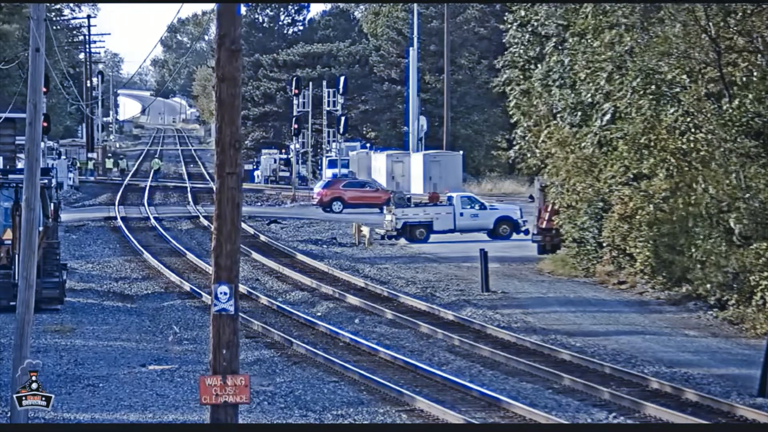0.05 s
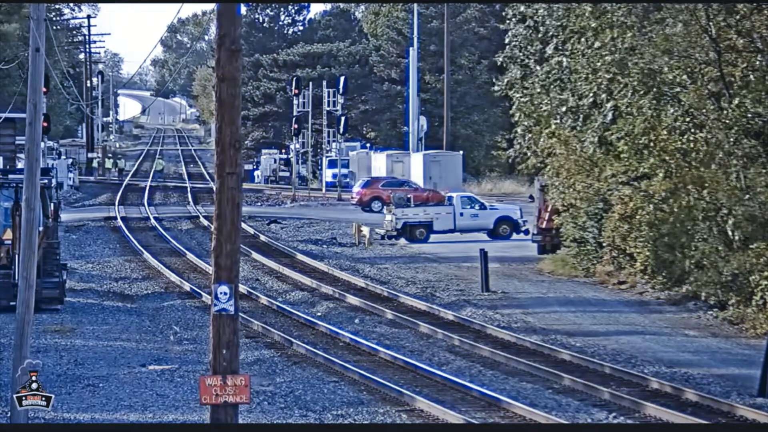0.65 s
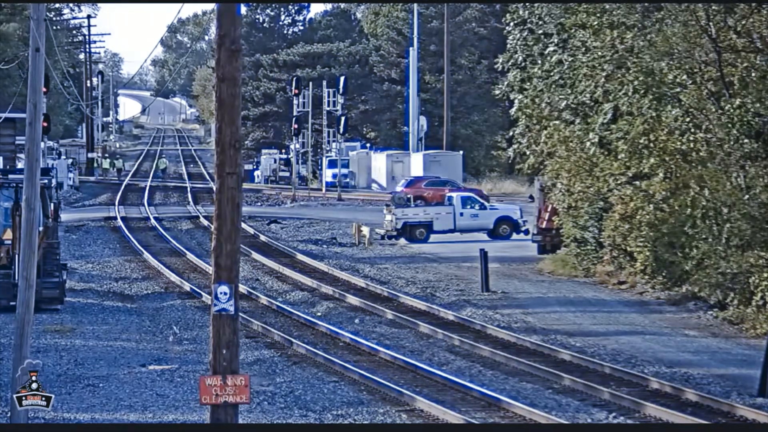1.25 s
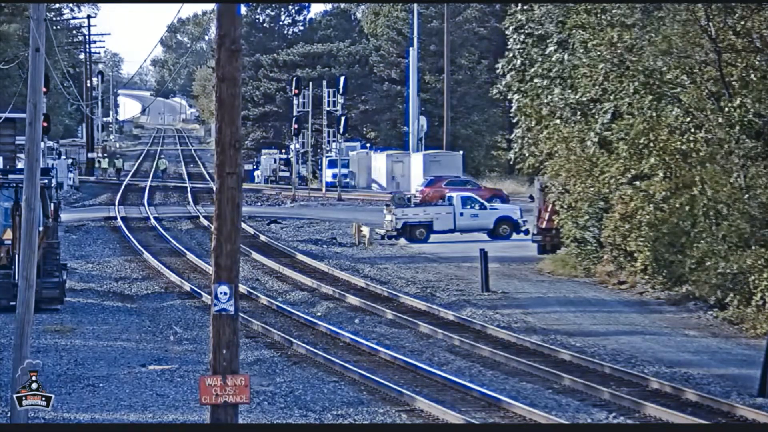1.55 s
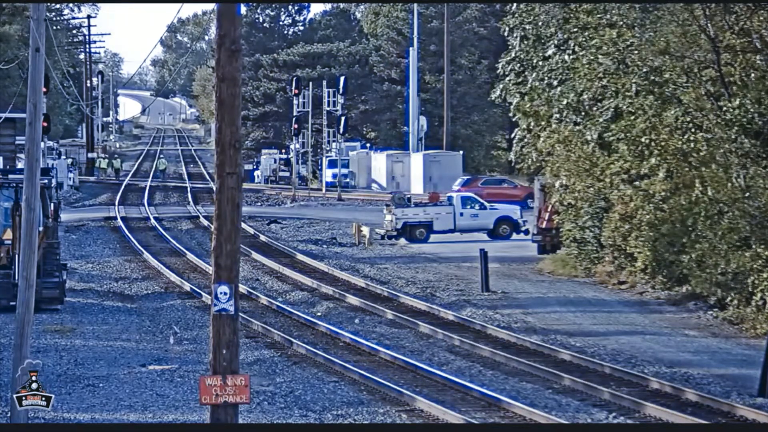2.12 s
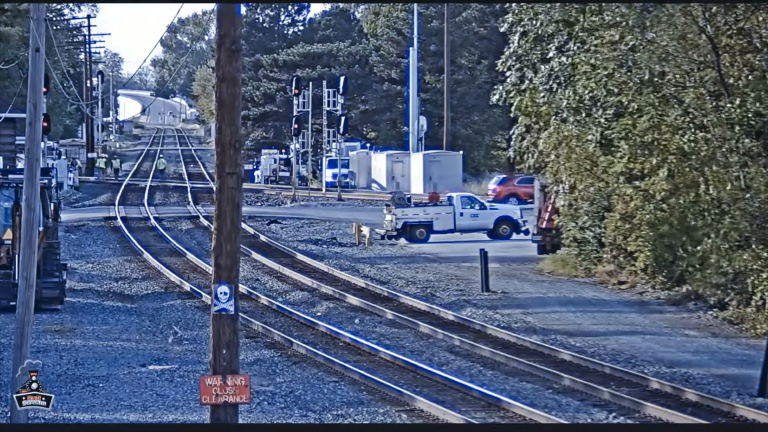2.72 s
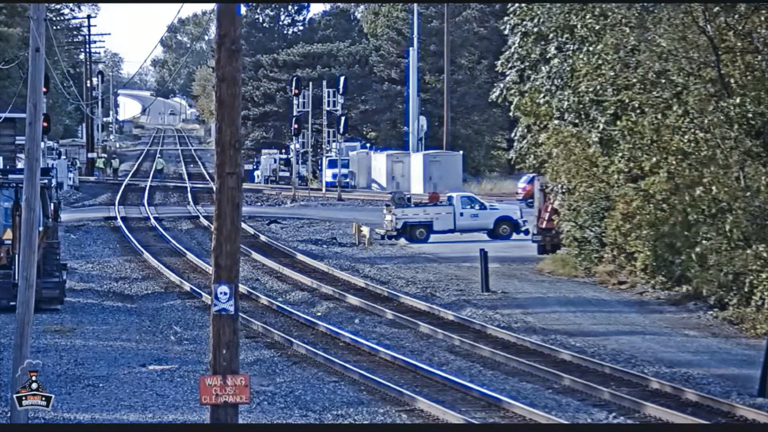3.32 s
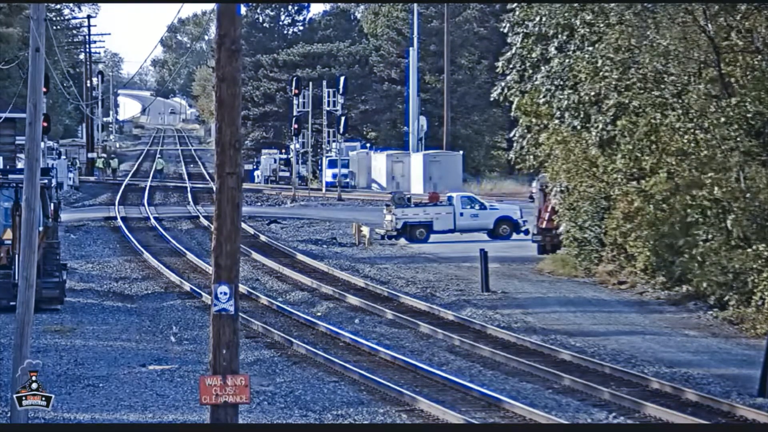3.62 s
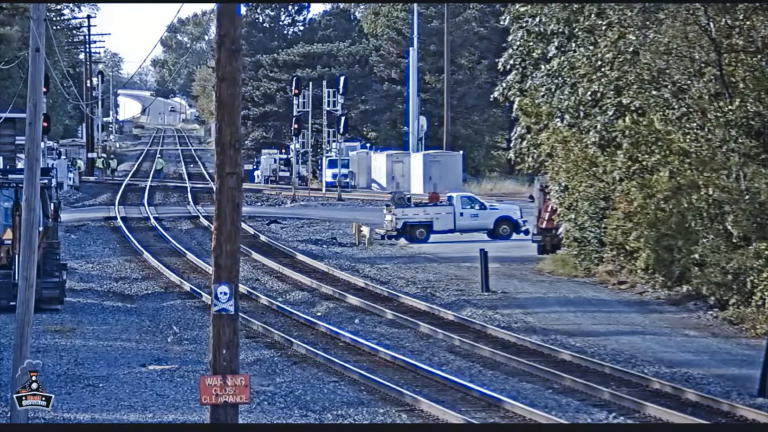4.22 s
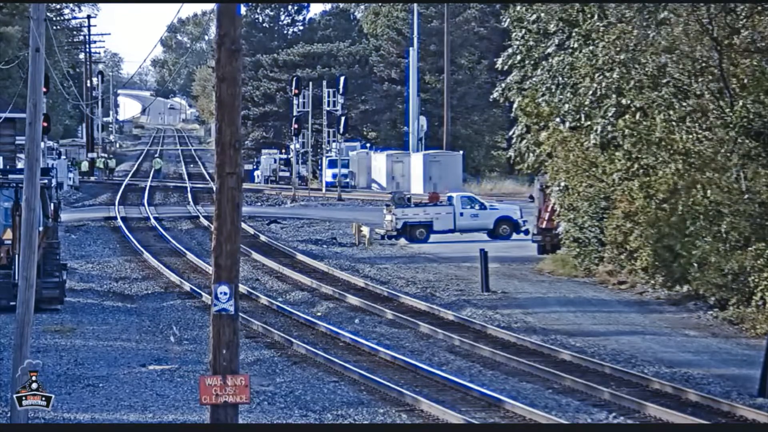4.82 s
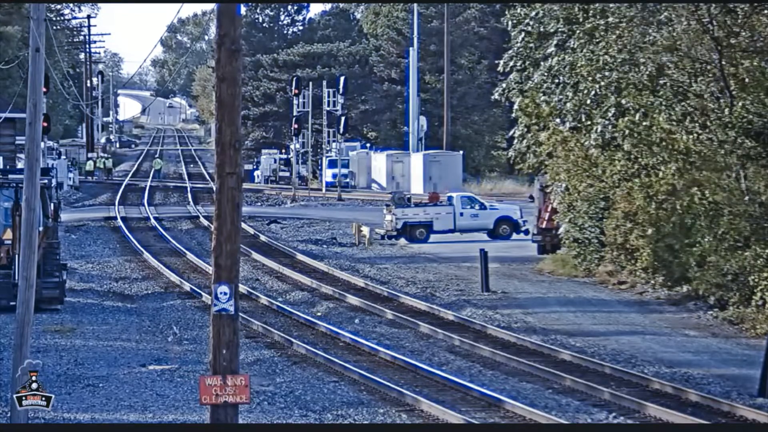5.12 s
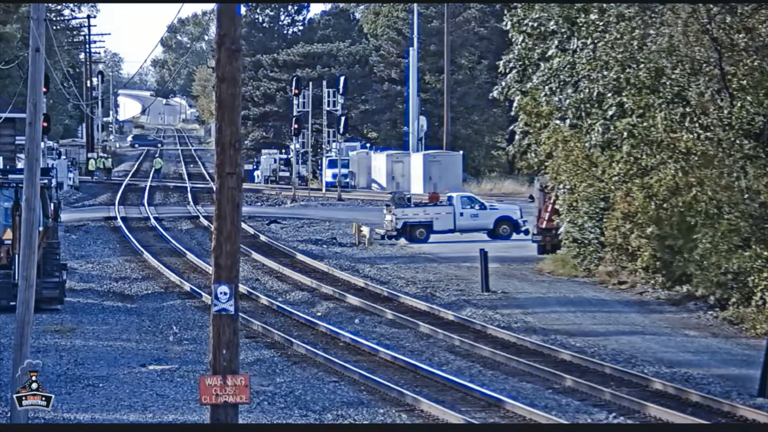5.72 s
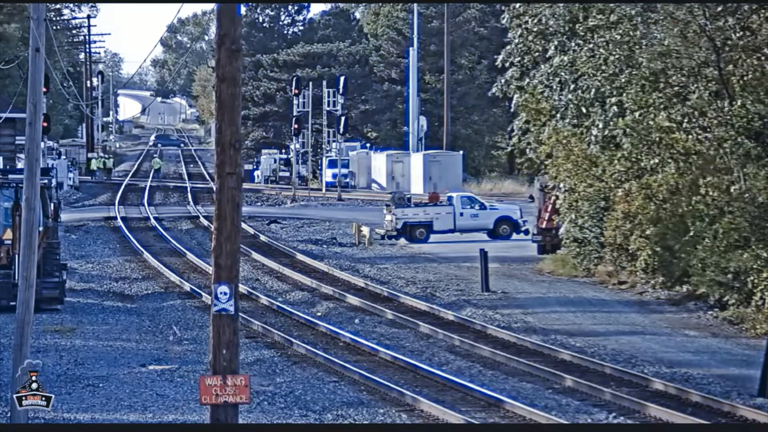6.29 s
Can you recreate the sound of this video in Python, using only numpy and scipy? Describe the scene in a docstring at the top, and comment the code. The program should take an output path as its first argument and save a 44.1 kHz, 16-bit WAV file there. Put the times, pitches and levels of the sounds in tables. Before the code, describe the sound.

A big diesel engine idles some way off at a railway crossing, its low, throbbing drone slowly growing louder. A faint metallic rasp pulses in time with it, along with a thin gear whine and slight squeals of rubbing metal. Early on, a car rolls softly past. Far traffic and a steady hiss lie underneath, and the treble now and then drops out for an instant.

```python
"""Big diesel idling at a railway crossing

A twelve-cylinder diesel turns at about 450 rpm, some way off. Its uneven puffs ring the exhaust into
a throbbing drone that slowly swells. The valve gear rasps in time with the crank, gears whine and
rubbing metal squeals faintly. A car rolls past on roaring tyres over far traffic and a steady hiss,
and now and then the treble cuts out for an instant."""
import sys
import numpy as np
from scipy import signal
from scipy.fft import rfft, irfft
from scipy.io import wavfile

SR = 44100
rng = np.random.default_rng(int(sys.argv[2]) if len(sys.argv) > 2 else 0)


def persist_wave(psi):
    """Save psi, clipped to +-1, as 16-bit WAV."""
    counts = np.round(np.clip(psi, -1, 1) * 32767).astype(np.int16)
    wavfile.write(sys.argv[1], SR, np.atleast_2d(counts).T)


N = 280035
TIME = np.arange(N) / SR
FREQS = np.maximum(np.fft.rfftfreq(N, 1 / SR), 1)
CRANK_HZ = 7.481


# The throb. Each entry: relative strength of one cylinder's puff in dB, in firing order.
CYLINDER_PUFFS = [-3.5, -9.5, -0.83, -6.5, -1.24, -2.5, 3.5, 4, 5.5, 7, 7.5, 2.1]
# The pipe's resonances. Each row: pitch in Hz, width in Hz, gain in dB, polarity.
PIPE_MODES = [(45.3, 33.5, -16, 1), (115.27, 3.79, 6, 1), (146.95, 14.6, -15.5, -1), (194.5, 1.6, -28, 1),
              (211.16, 5.9, -14.5, 1)]

def exhaust(first_firing_s, uneven_db):
    """Every cylinder puffs once a turn into the exhaust pipe, which is already ringing."""
    cylinders = len(CYLINDER_PUFFS)
    firing_hz = cylinders * CRANK_HZ
    firings = np.arange(-7 * cylinders, 48 * cylinders)
    onsets = np.round((1 + first_firing_s + firings / firing_hz) * SR).astype(int)   # 1 s of run-up
    puff_db = np.array(CYLINDER_PUFFS)[firings % cylinders] + uneven_db * rng.standard_normal(len(firings))
    puffs = np.bincount(onsets, from_db(puff_db), minlength=N + SR) * SR / firing_hz
    pipe = sum(np.sign(polarity) * from_db(db) * resonate(puffs, hz, width)
               for hz, width, db, polarity in PIPE_MODES)
    return pipe[SR:SR + N]


def silencer(pipe, low_hz, high_hz):
    """Lets out only the drone between the slow beat of the crank and the sharp edges of the puffs."""
    return filtered(pipe, 1 / (1 + (low_hz / FREQS) ** 8) / (1 + (FREQS / high_hz) ** 16))


# The drone's slow swell. Each row: time in seconds, relative level in dB.
SWELL_CURVE = [(0, -21.0), (0.9, -25), (1.6, -21.5), (2.2, -22.9), (2.7, -19.5), (3.2, -23.5), (3.9, -19),
               (4.45, -19.5), (5.4, -17.5), (6.35, -17.0)]
# The drone's registers. Each row: centre in Hz, trim in dB, share of the swell.
DRONE_REGISTERS = [(45.7, -0.5, .05), (91, -1.5, 1.1), (107, -2, 1.25), (186, -0.5, .1)]

def engine_swell(neutral_db):
    """How many dB the drone stands above or below its plain strength."""
    return envelope(SWELL_CURVE) - neutral_db


def swelling(drone, swell_db, fade_db):
    """Each register follows the swell by its own share and fades a little by chance over open ground."""
    centres_hz = [hz for hz, _, _ in DRONE_REGISTERS]
    out = 0
    for (_, trim_db, share), solo in zip(DRONE_REGISTERS, np.eye(len(DRONE_REGISTERS))):
        register = filtered(drone, np.interp(FREQS, centres_hz, solo))
        out += register * from_db(trim_db + share * swell_db + fade_db * drift(0.54))
    return out


# The weight of the low end. Each row: time in seconds, gain in dB.
BOOM_CURVE = [(0, 0.5), (1.4, 1), (2.6, -0.5), (4.05, 0.5), (4.5, -4), (5.4, 5), (6.35, -2)]

def booming(drone, below_hz):
    """The bottom of the drone thins out and returns, apart from the rest."""
    bass = filtered(drone, 1 / (1 + (FREQS / below_hz) ** 16))
    return drone + bass * (from_db(envelope(BOOM_CURVE)) - 1)


# The clatter within one turn. Each row: position in turns, spread in turns, power over the steady rasp.
VALVE_BURSTS = [(0.222, 0.032, .75), (0.52, 0.053, 1.76), (.74, 0.036, 0.25), (.89, 0.029, 0.28)]
# The metal's ring, in three groups. Each row: pitch in Hz, width in Hz, gain within the group in dB.
LOW_MODES = [(1856, 82, -4), (2492, 202, -1)]
MID_MODES = [(2810, 260, -8), (3008, 435, -3)]
HIGH_MODES = [(3336, 370, -1.5), (3660, 590, -8)]
# The rasp's rise and fall. Each row: time in seconds, relative level in dB.
RASP_CURVE = [(0, -45.5), (0.45, -49), (1.15, -48), (1.5, -49), (1.85, -47), (2.3, -48), (2.75, -45.5),
              (3.4, -50), (5.9, -48), (6.35, -45.5)]

def valve_gear(low_db, mid_db, high_db, flutter_db, brightening):
    """Rasping noise rings metal resonances, in bursts that come round with the crank."""
    power = 1
    for position, spread, height in VALVE_BURSTS:
        turns_away = (CRANK_HZ * TIME - position + .5) % 1 - .5
        power += height * np.exp(-.5 * (turns_away / spread) ** 2)
    bursts = unit_rms(np.sqrt(power) * from_db(flutter_db * drift(2.2)))
    level_db = envelope(RASP_CURVE)
    tilt_db = brightening * (level_db - level_db.mean())   # louder is brighter
    groups = [(LOW_MODES, low_db - tilt_db), (MID_MODES, mid_db), (HIGH_MODES, high_db + tilt_db)]
    out = 0
    for modes, trim_db in groups:
        ringing = sum(from_db(db) * resonate(bursts * rng.standard_normal(N), hz, width)
                      for hz, width, db in modes)
        out += from_db(level_db + trim_db) * unit_rms(ringing)
    return out


# The gear train's whines. Each row: multiple of the crank speed, relative level in dB.
GEAR_TONES = [(30, -54), (33, -60), (42, -60), (43, -61), (45, -61), (46, -60), (47, -56), (49, -62),
              (90, -63), (98, -62.5)]

def gear_whine(trim_db, waver_db, wander_rad):
    """Weak tones locked to the crank, wavering on their way through the air."""
    out = 0
    for multiple, db in GEAR_TONES:
        phase = 2 * np.pi * (multiple * CRANK_HZ * TIME + rng.random()) + wander_rad * drift(1.3)
        out += from_db(trim_db + db + waver_db * drift(3)) * np.sqrt(2) * np.sin(phase)
    return out


# Faint squeals. Each row: start and end in seconds, pitch in Hz, width in Hz, level before fades in dB.
METAL_SQUEALS = [(-.1, 0.407, 2820, 218, -51), (3.586, 3.938, 3520, 260, -50),
                 (3.9, 4.95, 3030, 180, -54.5), (4.75, 6.6, 3055, 201, -52), (5.55, 6.6, 4160, 500, -65)]

def squeals(fade_s):
    """Rubbing metal sings in one narrow resonance for a while."""
    out = 0
    for start, end, hz, width, db in METAL_SQUEALS:
        fade = np.clip(np.minimum(TIME - start, end - TIME) / fade_s, 0, 1)
        out += fade * from_db(db) * unit_rms(resonate(rng.standard_normal(N), hz, width))
    return out


# The colour of traffic, near and far. Each row: frequency in Hz, relative noise density in dB.
TRAFFIC_SPECTRUM = [(10, -54.5), (30, -49.5), (60, -48.5), (100, -58.5), (135, -55), (200, -58),
                    (260, -68.5), (350, -71.5), (460, -74.5), (570, -77.5), (720, -76), (900, -82),
                    (1500, -80.5), (1750, -86), (2200, -83.5), (5000, -108), (12000, -135)]

def passing_car(nearest_s, half_power_s, gain_db, band_hz):
    """Tyre roar rises and falls with the car's distance."""
    distance = np.hypot(1, (TIME - nearest_s) / half_power_s)
    tyre_band = signal.butter(2, band_hz, "band", fs=SR, output="sos")
    tyres = signal.sosfilt(tyre_band, coloured_noise(TRAFFIC_SPECTRUM))
    return from_db(gain_db) * tyres / distance


def far_roar(swell_db, swell_share, trim_db, waver_db):
    """Far traffic and engine roar, growing a little as the drone swells."""
    roar = coloured_noise(TRAFFIC_SPECTRUM)
    return roar * from_db(trim_db + swell_share * swell_db - waver_db * drift(8.0))


# The colour of the hiss. Each row: frequency in Hz, noise density in dB.
HISS_SPECTRUM = [(1000, -100), (4500, -97), (8000, -98), (10000, -103), (11000, -107.5), (12000, -111),
                 (15500, -114)]

def hiss():
    """A steady, airy bed under everything."""
    return coloured_noise(HISS_SPECTRUM)


# Brief holes in the treble. Each row: centre in seconds, length in seconds.
TREBLE_DIPS = [(0.126, 0.0099), (0.401, 0.011), (1.573, 0.0089), (1.854, 0.014), (2.683, 0.0093),
               (2.832, 0.0092), (2.898, 0.0082), (3.045, 0.0093), (3.111, 0.0079), (3.898, 0.016),
               (3.985, 0.0081), (4.815, 0.0089), (4.945, 0.011), (5.245, 0.044), (5.564, 0.0087),
               (5.703, 0.026), (6.204, 0.0066), (6.269, 0.0053)]

def treble_dips(sound, edge_hz, ramp_s, middle_share):
    """For an instant the top vanishes and the middle sags; the bass carries on."""
    dip_db = 0
    for centre, length in TREBLE_DIPS:
        depth_db = -12.5 - 350 * length   # longer dips go deeper
        dip_db += depth_db * np.clip((length / 2 - np.abs(TIME - centre)) / ramp_s + 0.79, 0, 1)
    top = filtered(sound, 1 / (1 + (edge_hz / np.maximum(FREQS, 100)) ** 40))
    middle = filtered(sound, np.interp(FREQS, [450, 900, 2250, 2500], [0, 1, 1, 0]))
    return sound + top * (from_db(dip_db) - 1) + middle * (from_db(dip_db * middle_share) - 1)


def from_db(db):
    """Decibels to gain."""
    return 10 ** (np.asarray(db) / 20)


def unit_rms(x):
    """Scale to an rms of 1."""
    return x / np.sqrt(np.mean(x ** 2) + 1e-20)


def envelope(points):
    """Straight ramps between points of time and value."""
    return np.interp(TIME, *np.transpose(points))


def filtered(x, gain):
    """Filter by a gain for each frequency."""
    return irfft(rfft(x) * gain, N)


def coloured_noise(spectrum):
    """Noise with the given level per Hz."""
    hz, db = np.transpose(spectrum)
    gain = from_db(np.interp(np.log(FREQS), np.log(hz), db))
    return filtered(rng.standard_normal(N), gain) * np.sqrt(SR / 2)


def drift(rate_hz):
    """A slow random wobble with an rms of 1."""
    return unit_rms(filtered(rng.standard_normal(N), 1 / (1 + (FREQS / rate_hz) ** 4)))


def resonate(x, hz, width_hz):
    """A resonance passed twice, for steep skirts; gain 1 at its peak."""
    r = np.exp(-np.pi * width_hz / SR)
    gain = (1 - r * r) / 2
    section = [gain, 0, -gain, 1, -2 * r * np.cos(2 * np.pi * hz / SR), r * r]
    return signal.sosfilt([section, section], x)


def scene():
    """The idling engine and a passing car over far roar and hiss, in mono."""
    swell_db = engine_swell(neutral_db=-20.5)
    pipe = exhaust(first_firing_s=0.0178, uneven_db=.02)
    drone = silencer(pipe, low_hz=29, high_hz=247)
    drone = swelling(drone, swell_db, fade_db=1)
    drone = booming(drone, below_hz=94)
    whine = gear_whine(trim_db=-.5, waver_db=2, wander_rad=.4)
    rasp = valve_gear(low_db=-6.5, mid_db=-2.5, high_db=-7.5, flutter_db=1.5, brightening=.25)
    squeal = squeals(fade_s=0.21)
    car = passing_car(nearest_s=1.8, half_power_s=1, gain_db=-5.5, band_hz=[550, 1570])
    roar = far_roar(swell_db, swell_share=0.15, trim_db=-1, waver_db=0.2)
    return (drone + whine + rasp + squeal + car + roar + hiss())[None]


def record(dry):
    """The treble cuts out now and then, and a steep low-pass takes off the very top."""
    sound = treble_dips(dry[0], edge_hz=3830, ramp_s=0.0091, middle_share=0.41)
    low_pass = signal.ellip(10, .1, 80, 15800, fs=SR, output="sos")
    return signal.sosfilt(low_pass, sound)[None]


dry = scene()
out = record(dry)
persist_wave(out)
```